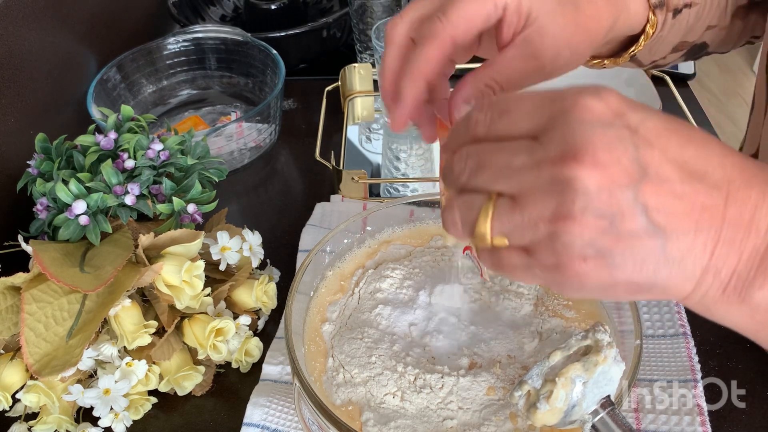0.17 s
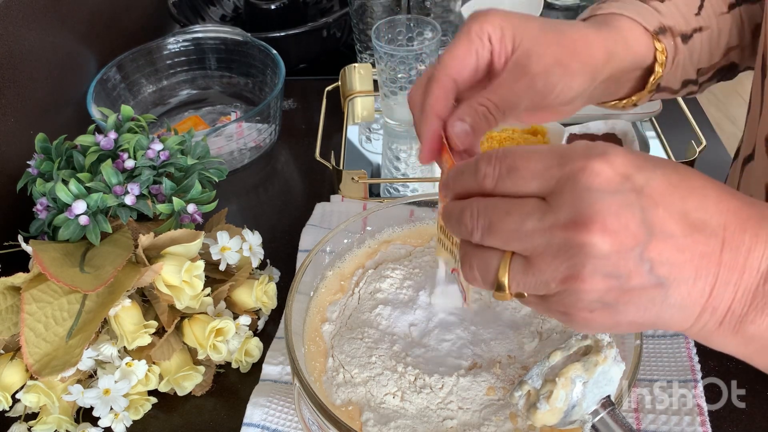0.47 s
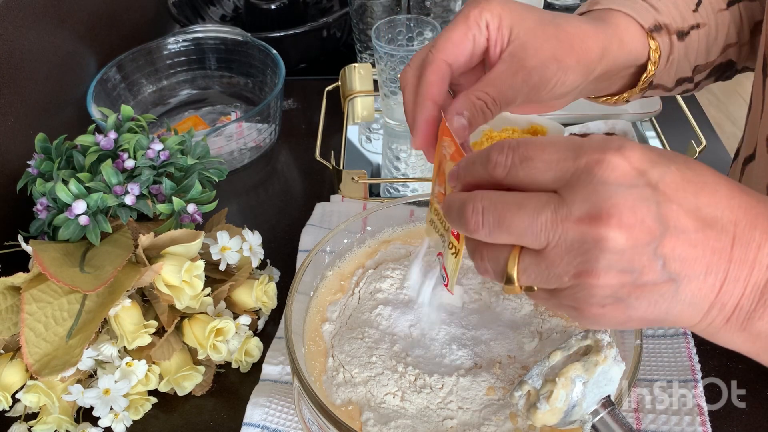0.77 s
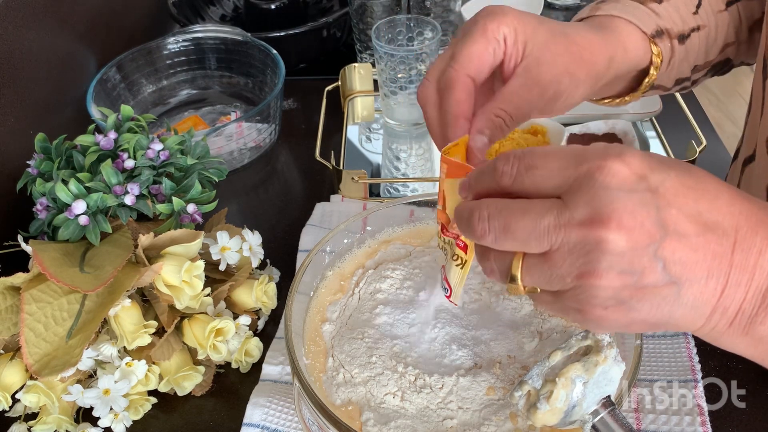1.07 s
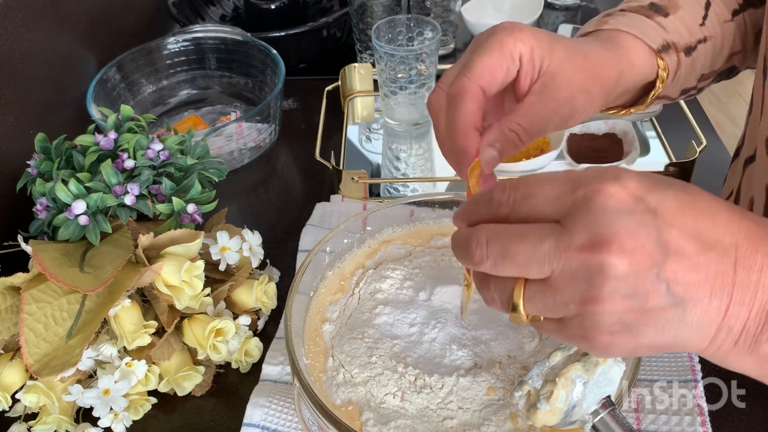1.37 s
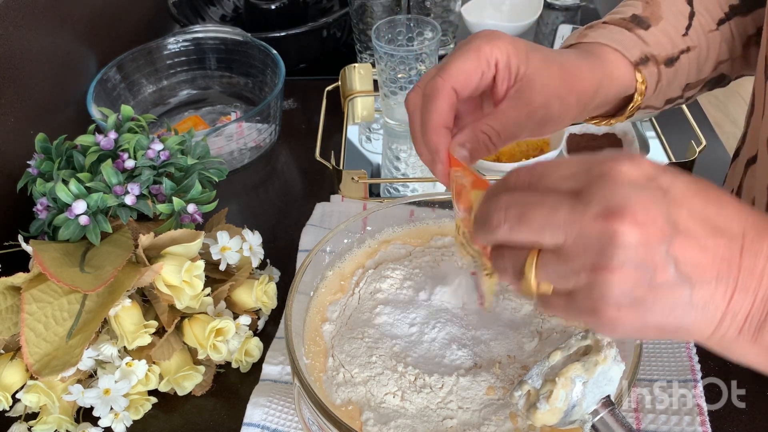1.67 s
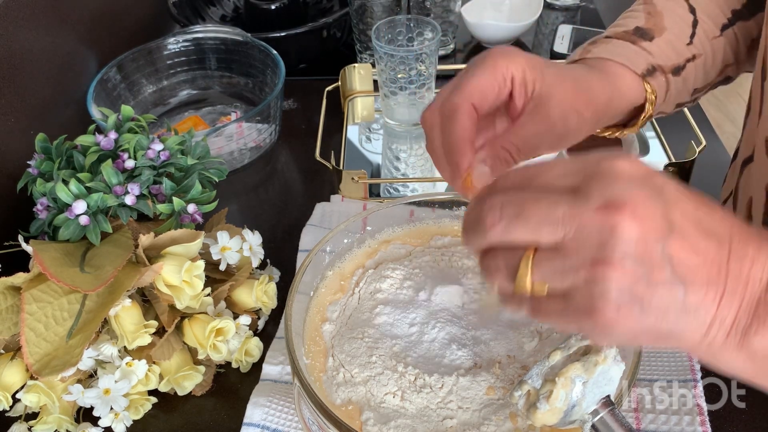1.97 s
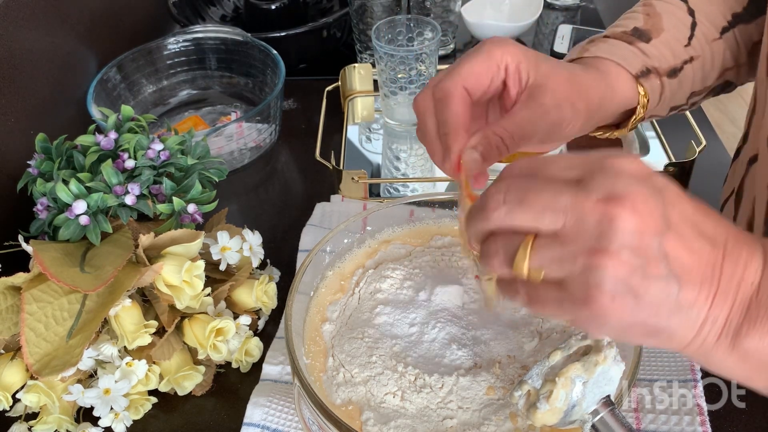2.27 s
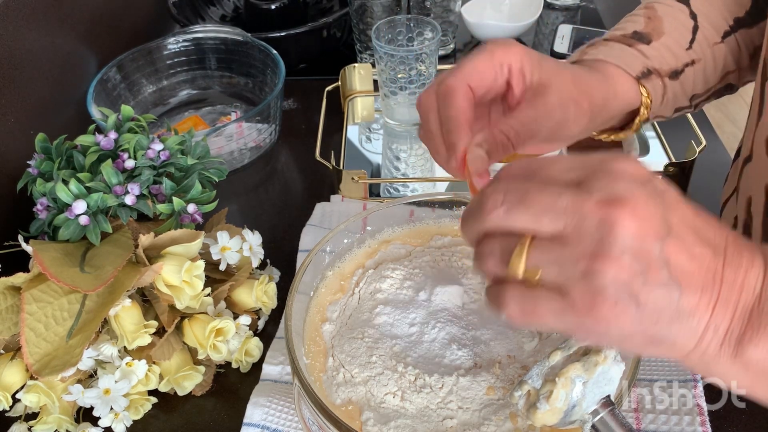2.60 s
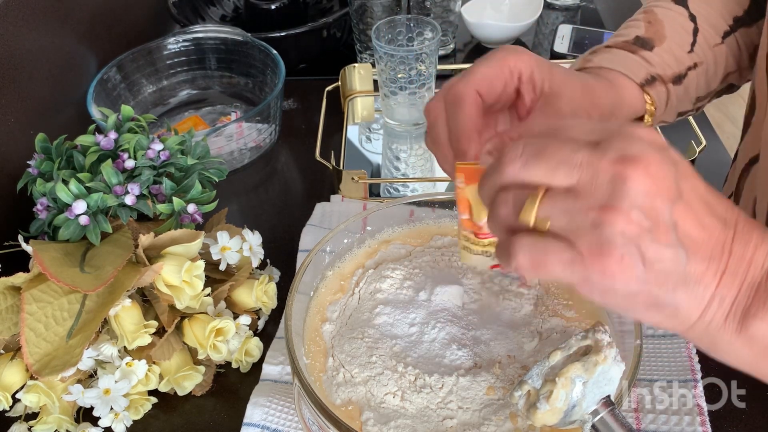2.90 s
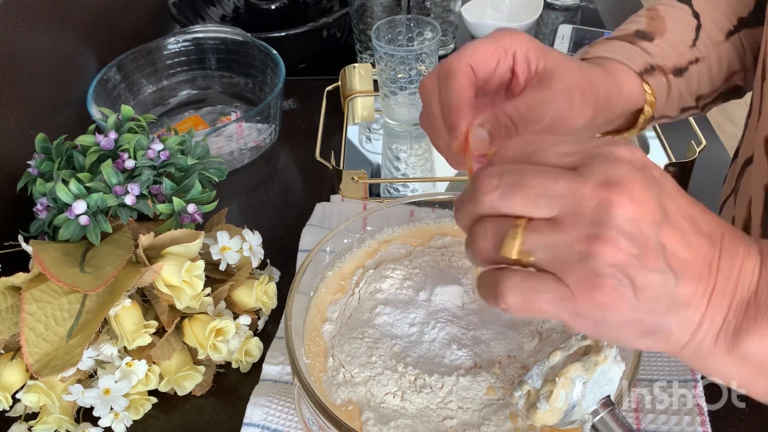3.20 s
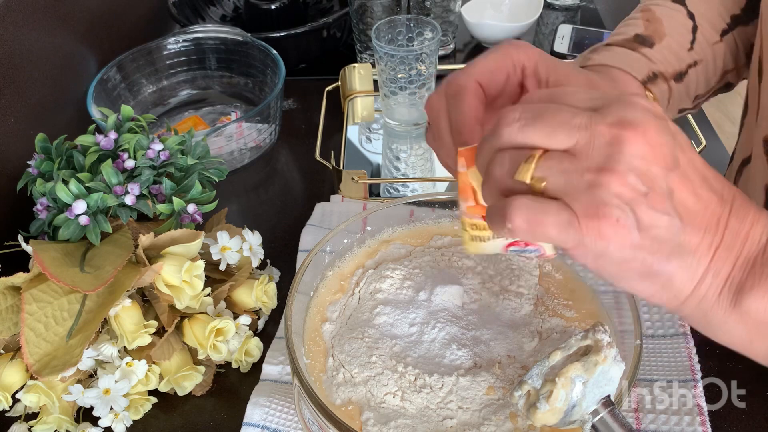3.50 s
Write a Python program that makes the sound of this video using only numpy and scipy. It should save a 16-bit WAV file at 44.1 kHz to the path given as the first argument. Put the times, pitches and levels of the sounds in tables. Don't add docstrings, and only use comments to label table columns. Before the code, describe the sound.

A small stiff paper sachet crinkles close up: sparse light crackles first, then firmer, denser squeezing and shaking with soft airy thuds, in a small quiet kitchen with faint low hum, close stereo microphone.

```python
import sys
import numpy as np
from scipy import signal
from scipy.fft import rfft, irfft, next_fast_len
from scipy.io import wavfile

SR = 44100
rng = np.random.default_rng(int(sys.argv[2]) if len(sys.argv) > 2 else 0)


def store_pcm(level_fs):
    pcm = np.round(np.clip(level_fs, -1, 1) * 32767).astype(np.int16)
    wavfile.write(sys.argv[1], SR, np.atleast_2d(pcm).T)


def amplitude_ratio(level_db):
    exponent = np.asarray(level_db, float) / 20
    return 10 ** exponent


N = 160965

# pitch_hz, level_db (per Hz)
HUM_COLOUR = [(30, -1.5), (55, -5), (120, -4.5), (210, -4), (260, -25), (450, -15.5), (1200, -31),
              (12000, -41)]
# pitch_hz, likeness (0-1)
HUM_LIKENESS = [(180, 0.97), (320, 0.64), (700, 0)]
HUM_DB = -53.5
HUM_TONE_HZ, HUM_TONE_WIDTH_HZ, HUM_TONE_DB = 113.2, 24, -2.5

# start_s, level_db (peak),
# bright_db, swell_ms, pitch_hz (ring)
CREASES = [(0.1335, -21, -2.5, 2.13, 3090), (0.4117, -25.5, -37, 1.2, 3170),
           (0.4927, -50, 1, 3.4, 4600), (0.5945, -38, -10.5, 11, 3330),
           (0.6329, -16, -9.5, 1.68, 2260), (0.7253, -33.5, -25, 6.5, 2330),
           (0.7483, -31, -11.5, 2.6, 2280), (0.8181, -16.5, -11.5, 1.4, 3200),
           (0.832, -23, -24, 7.4, 2240), (0.8427, -19.5, -16, 3.8, 3430),
           (0.9167, -29, -10, 3.6, 5660), (0.9434, -28.5, 0, 2.15, 3840),
           (0.9934, -26.5, -22, 2.5, 6400), (1.0149, -22, -15, 1.8, 2770),
           (1.0207, -20, 8.5, 1.62, 2080), (1.1463, -25.5, -7, 3.4, 2390),
           (1.2249, -38, -33, 1.1, 2100), (1.2349, -28.5, -19, 3.87, 4250),
           (1.2621, -35.4, -20, 2, 5900), (1.2818, -25, 1.2, 1.4, 5130),
           (1.3302, -23, -39, 1.2, 1980), (1.3531, -45, -27, 2.9, 2130),
           (1.3721, -23, -52, 1.4, 1830), (1.405, -47, -16.3, 2, 3450),
           (1.4296, -10.5, -12.5, 0.74, 4270), (1.4331, -28.5, -6, 7.9, 3020),
           (1.4739, -15.5, -9, 3.1, 3490), (1.5249, -22.5, -2.5, 0.98, 2010),
           (1.5475, -40, -25, 1.9, 2050), (1.5662, -33, -20, 4.4, 2750),
           (1.5848, -15, -5, 1.96, 6400), (1.6754, -27, -14, 2.1, 1160),
           (1.6984, -22.5, -3, 0.94, 3680), (1.7156, -19.5, -4, 2.23, 2020),
           (1.7331, -37, 6, 1.2, 2070), (1.7646, -27, -10.4, 1, 2280), (1.7701, -35, 4.0, 1.97, 1260),
           (1.7833, -17.5, -23, 2.2, 4550),
           (1.7923, -30.5, 2, 2.1, 2020), (1.8494, -28, -7, 2.7, 4200),
                   (1.858, -24, -17, 1.6, 5060), (1.8789, -17, -1, 1.9, 4200),
                   (1.9085, -25, -1.5, 2.7, 6500), (1.95, -21, -20, 4.7, 3480),
                   (1.9561, -16.5, -8.5, 3, 3000), (1.9765, -29, -2, 1.5, 2900),
                   (1.993, -25.5, -12, 4, 1240), (2.004, -22, -16, 1.5, 4970),
                   (2.0224, -14.5, 2, 1.2, 6520), (2.035, -28, -13, 1.6, 5900),
                   (2.0623, -15.5, -7.8, 1.6, 3700), (2.068, -18.5, -21, 1.5, 3670),
                   (2.0889, -12.1, -6.5, 4.9, 3560), (2.1302, -28.5, 12, 1.1, 5100),
                   (2.1375, -30, -8, 1.1, 3600), (2.1514, -17, -7, 1.9, 3580),
                   (2.1854, -26, -26, 1.3, 3700), (2.2053, -16, -4.5, 2.4, 2840),
                   (2.21, -26, -12, 5.2, 3470), (2.2202, -28.5, 1.5, 2.3, 3700),
                   (2.2264, -14, -8, 2.4, 1980), (2.2769, -16, -0.5, 2.3, 3600),
                   (2.295, -27.5, 8, 2.6, 3660), (2.301, -16.5, -2, 4, 2980), (2.306, -16, -3, 3.36, 3470),
                   (2.3265, -40, 9, 1.9, 4670), (2.3976, -19, -13, 3.1, 2100), (2.4073, -12, -7, 1.6, 2110),
                   (2.4375, -24, -8, 1.8, 1400), (2.4668, -14.5, -13.5, 3.4, 4760),
                   (2.4846, -22, -6, 3.6, 3900), (2.5057, -29.5, 9.5, 1.6, 6120),
                   (2.5272, -27, -6, 3.3, 3550), (2.598, -32, -16, 2, 5200), (2.6031, -16, -12, 2.98, 2870),
                   (2.6125, -11.5, -6, 3.5, 1330),
           (2.6466, -46, -12, 2.1, 1430), (2.6578, -16.5, -1, 1.2, 2800),
                 (2.6699, -16, -5.4, 4.4, 1400), (2.6973, -29.5, 3, 1.24, 3740),
                 (2.736, -37, 0.9, 1.85, 2150), (2.7851, -22.5, -11, 3.7, 5250),
                 (2.811, -14.6, -9, 1.8, 2030), (2.8462, -22, -2, 4.3, 1940), (2.8624, -20, 3, 3.9, 1980),
                 (2.8666, -15.5, -10.5, 3.4, 1200), (2.8795, -36, 10, 1.8, 2030),
                 (2.896, -36, 11, 1.3, 3620), (2.9319, -32.8, 1, 2.04, 4500), (2.941, -27, -3, 3.3, 3030),
                 (2.9877, -25.5, -10, 7.1, 2100), (2.9988, -10, -9.5, 2.9, 2200),
                 (3.043, -18.5, -8.5, 4.7, 1810), (3.0526, -16, -2, 2.1, 1970),
                 (3.065, -28.5, 6, 2.3, 6240), (3.1024, -29.5, -16, 2.3, 3430),
                 (3.1122, -20.5, -2.5, 2.3, 3550), (3.165, -26.5, -41, 3.5, 1170),
                 (3.1754, -19.5, -32, 1.3, 2030), (3.1946, -20, -24, 7.3, 1995),
                 (3.2042, -17.5, 4, 3.3, 1940), (3.247, -13, -7, 5.2, 2970), (3.2663, -21.5, 3.1, 3, 2110),
                 (3.28, -30, 4, 1.8, 4240), (3.3147, -25, -4.5, 2.25, 5270), (3.3207, -22, -8, 2.4, 3620),
                 (3.3476, -21, -3, 2.1, 3750), (3.3856, -25, -5, 2.51, 3720),
                 (3.3951, -10.5, -23, 4.6, 2080), (3.402, -19, -1.5, 3.3, 1960),
                 (3.4486, -14.5, 1.5, 2.63, 2000), (3.4765, -27, 4.0, 1.9, 4390),
                 (3.509, -24, -12.5, 4.8, 1940), (3.5847, -36.5, -11.5, 5.7, 1210)]
# start_s, level_db (peak)
PLAIN_CREASES = [
    (0.425, -44),
    (0.858, -23.5),
    (1.607, -18.5),
    (1.884, -22.5),
    (2.284, -16.5),
    (2.412, -18.5),
    (2.618, -28.5),
    (2.806, -18.5),
    (3.454, -13),
]
# bright_db, swell_ms, pitch_hz (ring)
PLAIN_CREASE_COLOUR = (-9.5, 3.84, 2080)
SNAPS_PER_S, SNAP_CLUMP_DB, SNAP_SPREAD_DB, CLUMPS_PER_S = 5000, -2, 3, 263
CREASE_DB, BRIGHT_DB, COLOUR_CHANCE_DB = -12, 12.5, 3.0
HOLLOW_DB, HOLLOW_LAG_S = -11.5, 0.0017
SETTLE_DB, SETTLE_S = -14, 0.02
FACET_DB, FACET_SHARPNESS, STRAY_DB = 12.5, 37, -4

# start_s, level_db
FINGER_GRIP = [
    (0, -80),
    (1.2, -57.5),
    (2.1, -60.5),
    (3.45, -54),
    (3.65, -53),
]
RUSTLE_PER_S, RUSTLE_CLUMP_DB, RUSTLE_DB = 4000, 3, -9.5
RUSTLE_TILT_DB, HANDLING_S = -2.5, 0.016

# pitch_hz, level_db (per Hz)
PAPER_COLOUR = [(200, -2.5), (400, 3.5), (800, -4.5), (2000, -4), (3300, -4.5), (9500, -5), (12800, -20.5),
                (16000, -16.5)]
# pitch_hz, width_hz, level_db
POUCH_RINGS = [(600, 85, 3.5), (2018, 110, 3), (2740, 200, 3), (3550, 260, 0.5)]

# start_s, level_db (peak)
WALL_FLAPS = [(0.633, -52), (1.019, -42), (1.581, -43.5), (1.884, -37), (2.017, -33.5), (2.225, -35.5),
              (2.415, -41), (2.62, -33), (2.814, -39), (3.001, -37), (3.204, -28.5), (3.4, -36)]
FLAP_SWELL_S, FLAP_DB = 0.0049, 6
THUD_HZ, THUD_WIDTH_HZ, THUD_DB = 103, 10.7, 13.5

KITCHEN_T60_S, KITCHEN_DB, WALL_CUT_HZ = 0.14, -10.5, 5700

# pitch_hz, level_db
PORT_FACING = [(330, -6), (1100, 4.5), (5300, -3), (7000, 1)]
PORT_LAG_S, PORT_TURN_RAD, TURN_FROM_HZ, TURN_FADE_HZ = 0.000217, 2.23, 275, 3000
APART, ALIKE_FROM_HZ = 0.45, 6500
RUMBLE_CUT_HZ, TOP_CUT_HZ = 46, 17200


def rms_one(x):
    return x / np.sqrt(np.mean(x ** 2) + 1e-20)


def at_hz(points, hz):
    table = np.array(points)
    return np.interp(np.log(hz), np.log(table[:, 0]), table[:, 1])


def drift(rate_hz):
    r = np.exp(-2 * np.pi * rate_hz / SR)
    run_in = 9000
    wander = signal.lfilter([1], [1, -2 * r, r * r], rng.standard_normal(N + run_in))
    return rms_one(wander[run_in:])


def band(x, low_hz, high_hz):
    sos = signal.butter(2, [low_hz, min(high_hz, .48 * SR)], "band", fs=SR, output="sos")
    return signal.sosfilt(sos, x + 1e-18)


def resonance(x, hz, width_hz):
    r = np.exp(-np.pi * width_hz / SR)
    feed = np.array([1, 0, -1]) * (1 - r * r) / 2
    return signal.lfilter(feed, [1, -2 * r * np.cos(2 * np.pi * hz / SR), r * r], x)


def hum():
    out = 0
    edges = 25 * 2 ** np.arange(0, 9.4, .5)
    white = rng.standard_normal((2, 2, N))
    for k, (low, high) in enumerate(zip(edges, edges[1:])):
        mid, side = band(white[k % 2], low, high)
        hz = np.sqrt(low * high)
        alike = np.clip(at_hz(HUM_LIKENESS, hz), 0, 1)
        stereo = np.sqrt(1 + alike) * mid + np.sqrt(1 - alike) * side * [[1], [-1]]
        out = out + amplitude_ratio(at_hz(HUM_COLOUR, hz) + 2.35 * drift(3.5)) * stereo
    tone = resonance(out, HUM_TONE_HZ, HUM_TONE_WIDTH_HZ)
    return amplitude_ratio(HUM_DB) * rms_one(out + amplitude_ratio(HUM_TONE_DB) * tone)


def snaps(per_s, clump_db):
    sizes_db = SNAP_SPREAD_DB * np.minimum(rng.exponential(1, (2, N)), 4)
    sizes = amplitude_ratio(sizes_db) * rng.choice([-1, 1], (2, N))
    hits = rng.random((2, N)) < per_s / SR
    return rms_one(sizes * hits * amplitude_ratio(clump_db * drift(CLUMPS_PER_S)))


def rustle(working):
    start_s, grip_db = np.transpose(FINGER_GRIP)
    grip = amplitude_ratio(np.interp(np.arange(N) / SR, start_s, grip_db))
    return snaps(RUSTLE_PER_S, RUSTLE_CLUMP_DB) * (grip + amplitude_ratio(RUSTLE_DB) * working)


def crease_rows():
    plain = [(s, db, *PLAIN_CREASE_COLOUR) for s, db in PLAIN_CREASES]
    return np.vstack([CREASES, plain])


def swell_s(swell_ms):
    return max(swell_ms, .3) / 1000


def creases(centres_hz, hollow):
    t = np.arange(SR // 8) / SR
    bright = np.clip(np.log2(centres_hz / 4000), 0, 1)
    out = np.zeros((len(centres_hz), N + SR))
    for s, db, bright_db, swell_ms, _ in crease_rows():
        u = t / (swell_s(swell_ms) + HOLLOW_LAG_S * hollow)[:, None]
        swell = (u * np.exp(1 - u)) ** 2
        settle = amplitude_ratio(SETTLE_DB) * np.exp(-t / SETTLE_S) * (1 - np.exp(-u))
        level_db = db + CREASE_DB + bright * (bright_db + BRIGHT_DB) + hollow * HOLLOW_DB
        chance_db = COLOUR_CHANCE_DB * rng.standard_normal(len(centres_hz))
        i = int(s * SR)
        out[:, i:i + len(t)] += amplitude_ratio(level_db + chance_db)[:, None] * (swell + settle)
    return out[:, :N]


def facets(crack):
    out = np.zeros((2, N + SR))
    t = np.arange(SR // 25) / SR
    rows = crease_rows()
    crack = np.pad(crack, [(0, 0), (0, SR)])
    strays_hz = 700 * 16 ** rng.random((len(rows), 3))
    for (s, db, _, swell_ms, hz), others in zip(rows, strays_hz):
        i = int(s * SR)
        u = t / swell_s(swell_ms)
        burst = amplitude_ratio(db + CREASE_DB + FACET_DB) * crack[:, i:i + len(t)] * (u * np.exp(1 - u)) ** 2
        stray = sum(resonance(burst, other, other / FACET_SHARPNESS) for other in others)
        out[:, i:i + len(t)] += resonance(burst, hz, hz / FACET_SHARPNESS) + amplitude_ratio(STRAY_DB) * stray
    return out[:, :N]


def flaps(hollow):
    t = np.arange(SR // 8) / SR
    u = t / FLAP_SWELL_S
    out = np.zeros((len(hollow), N + SR))
    for s, db in WALL_FLAPS:
        i = int(s * SR)
        chance_db = COLOUR_CHANCE_DB * rng.standard_normal(len(hollow))
        level = amplitude_ratio(db + FLAP_DB + chance_db) * hollow ** 2
        out[:, i:i + len(t)] += level[:, None] * u * np.exp(1 - u)
    return out[:, :N]


def sachet():
    edges = 190 * 2 ** np.arange(0, 6.6, .4)
    centres = np.sqrt(edges[1:] * edges[:-1])
    hollow = np.clip(np.log2(1300 / centres), 0, 1)
    shapes = creases(centres, hollow) + flaps(hollow)
    crack = snaps(SNAPS_PER_S, SNAP_CLUMP_DB)
    span = int(HANDLING_S * SR)
    working = np.sqrt(signal.lfilter([1 / span], [1, 1 / span - 1], shapes[9] ** 2) + 1e-12)
    rubbing = rustle(working)
    paper = 0
    for k, hz in enumerate(centres):
        dulling = amplitude_ratio(RUSTLE_TILT_DB * np.log2(max(hz / 3000, 1)))
        layer = band(crack * shapes[k] + dulling * rubbing, edges[k], edges[k + 1])
        paper = paper + (-1) ** k * amplitude_ratio(at_hz(PAPER_COLOUR, hz)) * layer
    pouch = sum(amplitude_ratio(db) * resonance(paper, hz, width) for hz, width, db in POUCH_RINGS)
    thud = amplitude_ratio(THUD_DB) * resonance(crack[0] * shapes[0], THUD_HZ, THUD_WIDTH_HZ)
    return paper + pouch + facets(crack), thud


def kitchen(x):
    size = next_fast_len(N + SR)
    w = 2 * np.pi * np.arange(size // 2 + 1) / size
    echoes = np.zeros((2, size // 2 + 1), complex)
    walls = 1 / (1 + 1j * w * SR / (2 * np.pi * WALL_CUT_HZ * 2)) ** 2
    for k, lag in enumerate(rng.uniform(0.0068, 0.032, 16) * SR):
        loop = amplitude_ratio(-60 * lag / SR / KITCHEN_T60_S) * np.exp(-1j * w * lag) * walls
        echoes[k % 2] += (-1) ** (k // 2) * loop / (1 - loop)
    return irfft(echoes * rfft(x, size), size)[:, :N]


def two_ports(near, other):
    hz = np.arange(N // 2 + 1) * SR / N
    other = APART * irfft(rfft(other) / (1 + (hz / ALIKE_FROM_HZ) ** 4), N)
    turn_rad = PORT_TURN_RAD * np.minimum(hz / TURN_FROM_HZ, 1) ** 2 * np.exp(-(hz / TURN_FADE_HZ) ** 2)
    facing = amplitude_ratio(at_hz(PORT_FACING, hz + 1) / 2)
    delay = np.exp(1j * (turn_rad - 2 * np.pi * hz * PORT_LAG_S))
    left = irfft(rfft(near + other) * facing * delay, N)
    right = irfft(rfft(near - other) / facing, N)
    return np.array([left, right])


def scene():
    (near, other), thud = sachet()
    return two_ports(near, other) + thud + amplitude_ratio(KITCHEN_DB) * kitchen(near) + hum()


def top_cut(x):
    return signal.sosfilt(signal.butter(12, 16490, fs=SR, output="sos"), x)


def record(dry):
    x = signal.sosfilt(signal.butter(4, RUMBLE_CUT_HZ, "high", fs=SR, output="sos"), dry)
    x = signal.sosfilt(signal.cheby2(12, 70, TOP_CUT_HZ, fs=SR, output="sos"), x)
    return top_cut(x)


dry = scene()
out = record(dry)
store_pcm(out)
```